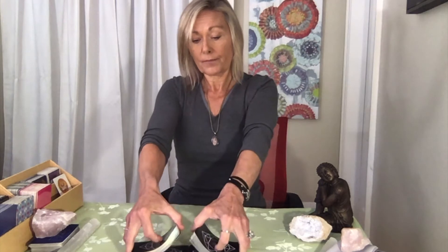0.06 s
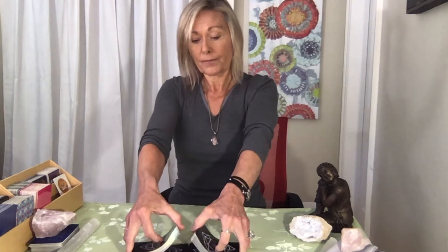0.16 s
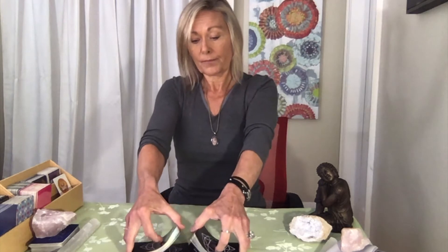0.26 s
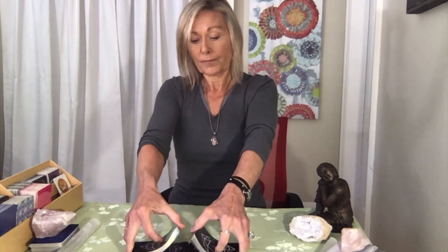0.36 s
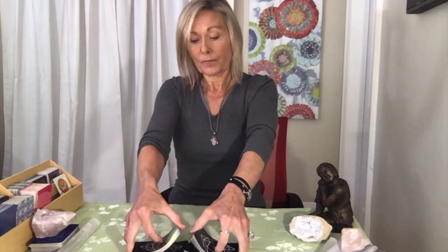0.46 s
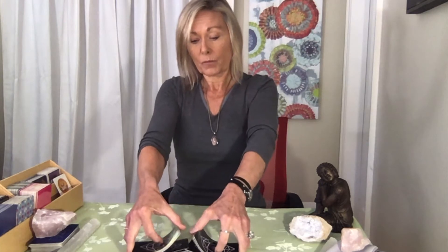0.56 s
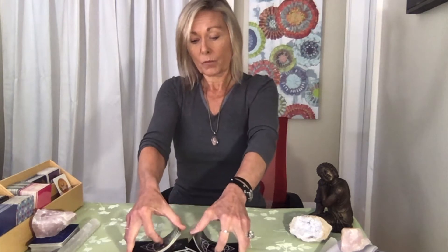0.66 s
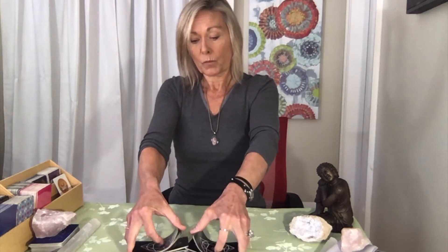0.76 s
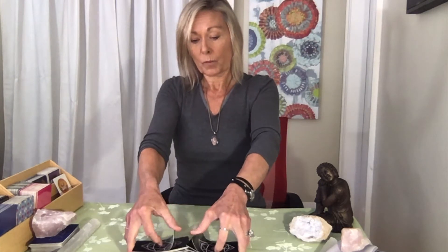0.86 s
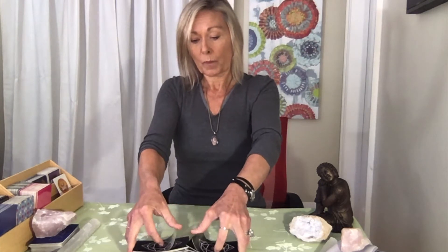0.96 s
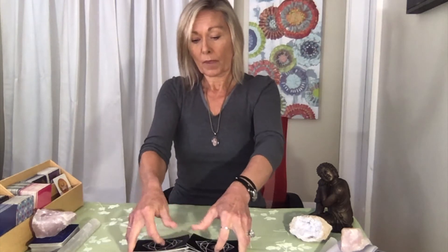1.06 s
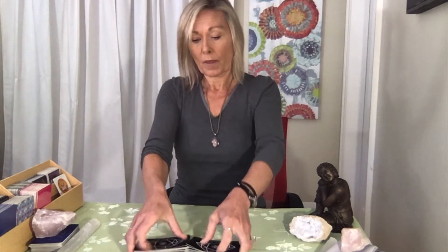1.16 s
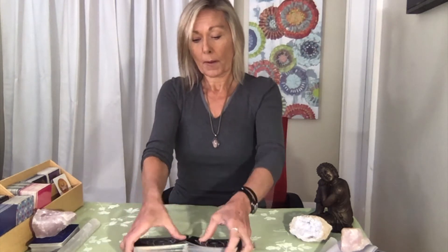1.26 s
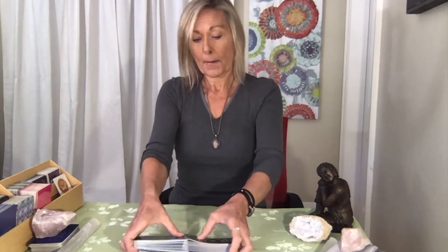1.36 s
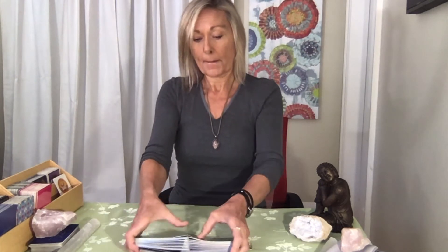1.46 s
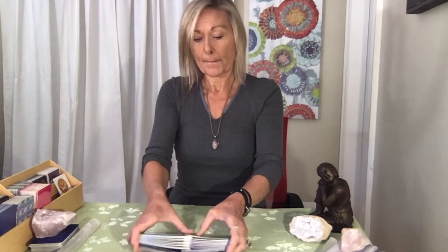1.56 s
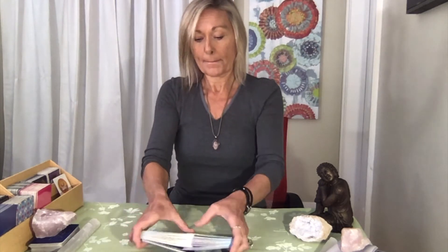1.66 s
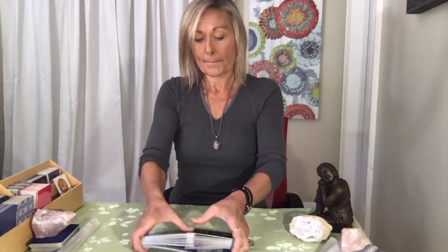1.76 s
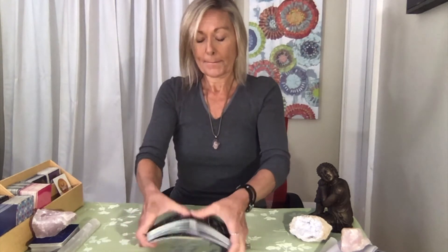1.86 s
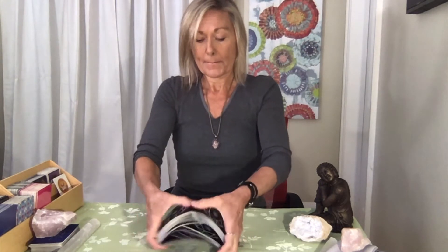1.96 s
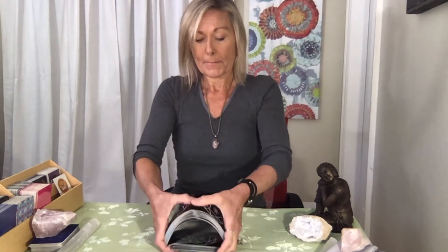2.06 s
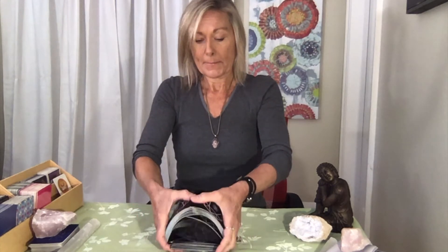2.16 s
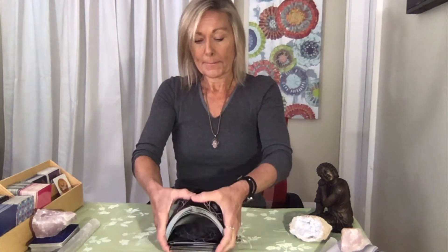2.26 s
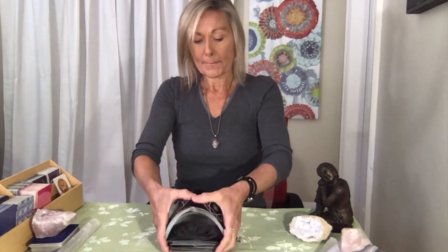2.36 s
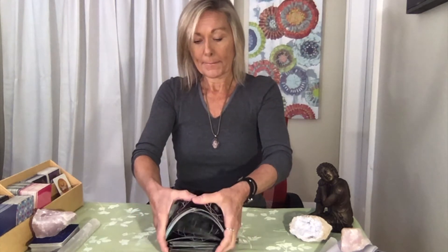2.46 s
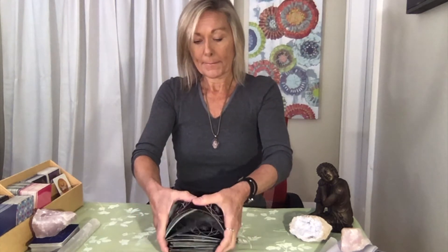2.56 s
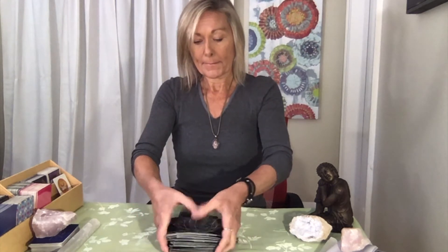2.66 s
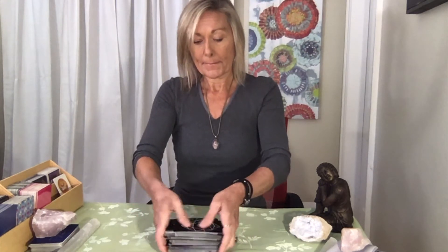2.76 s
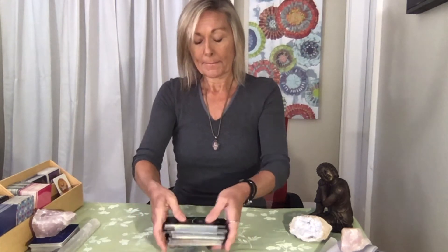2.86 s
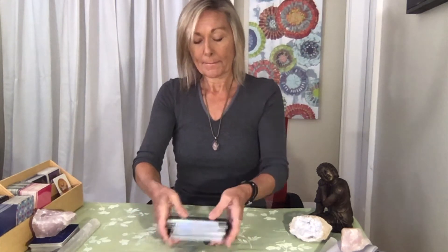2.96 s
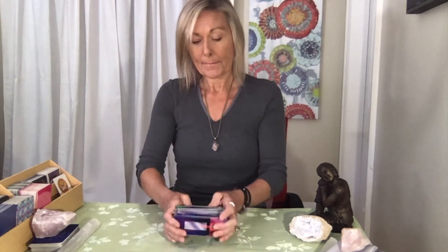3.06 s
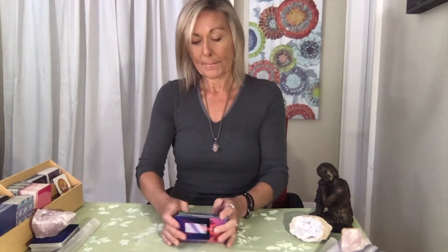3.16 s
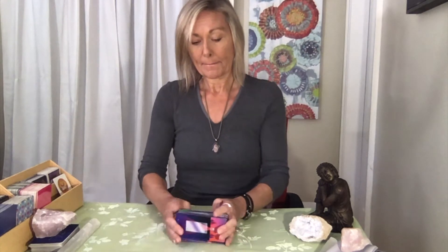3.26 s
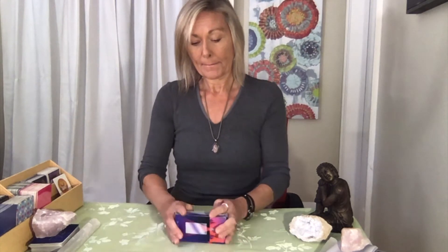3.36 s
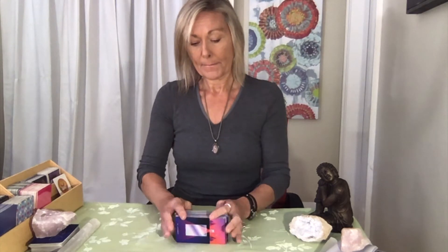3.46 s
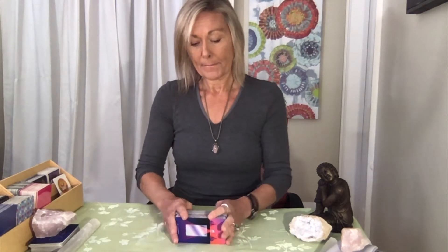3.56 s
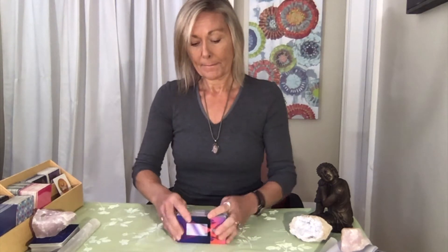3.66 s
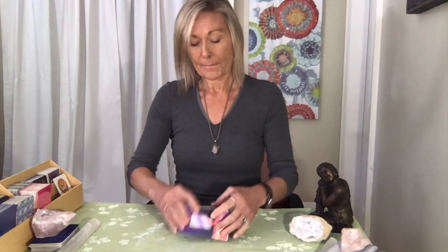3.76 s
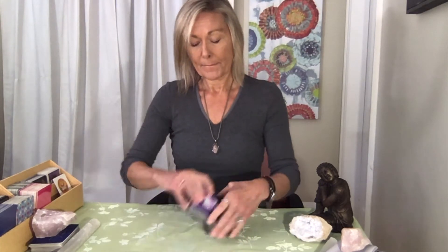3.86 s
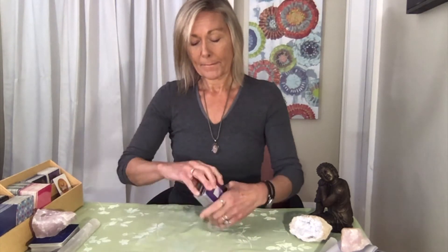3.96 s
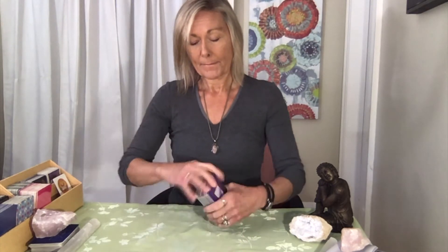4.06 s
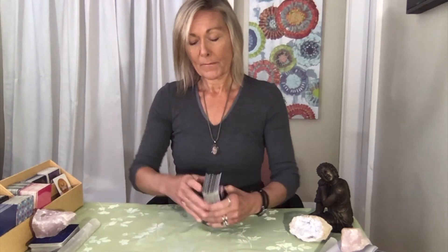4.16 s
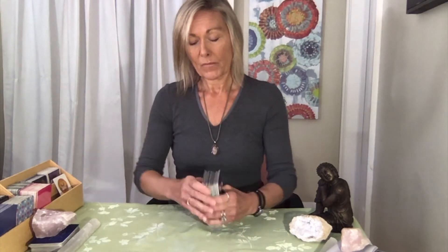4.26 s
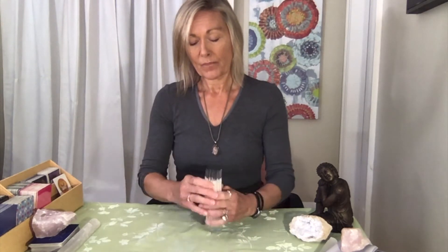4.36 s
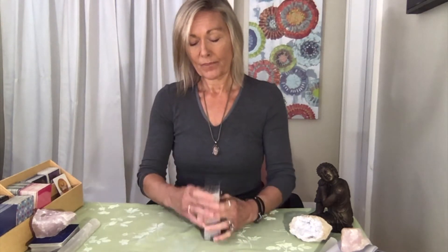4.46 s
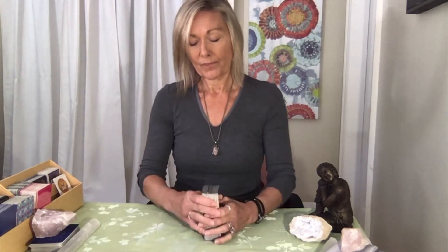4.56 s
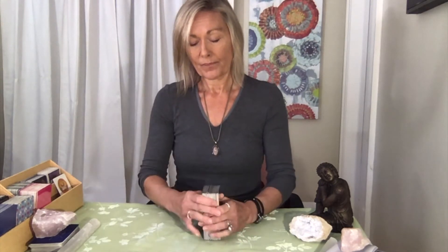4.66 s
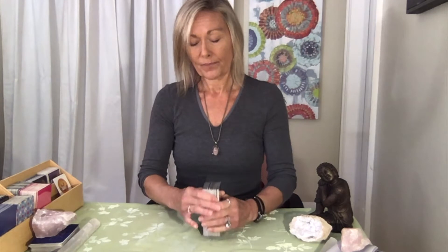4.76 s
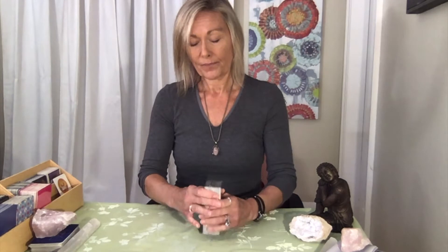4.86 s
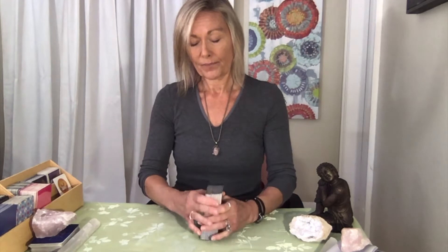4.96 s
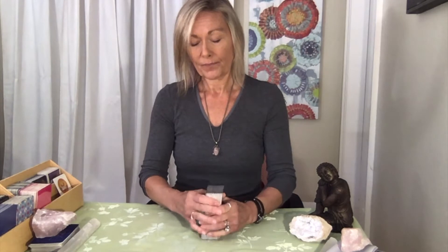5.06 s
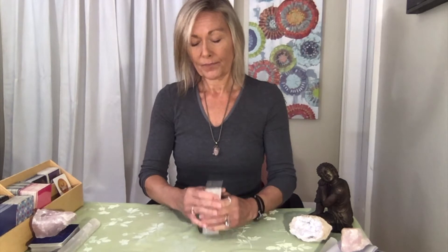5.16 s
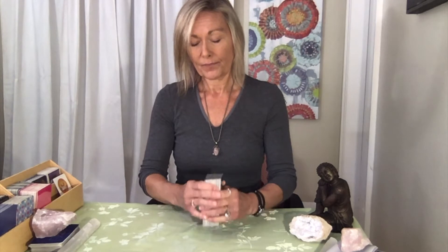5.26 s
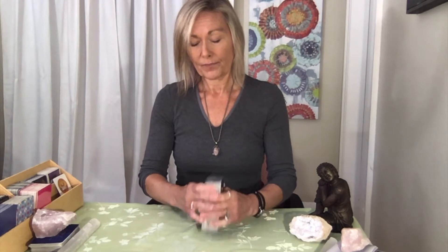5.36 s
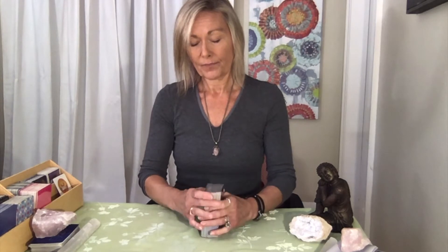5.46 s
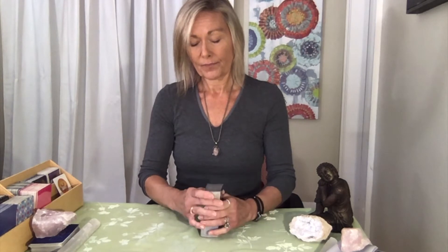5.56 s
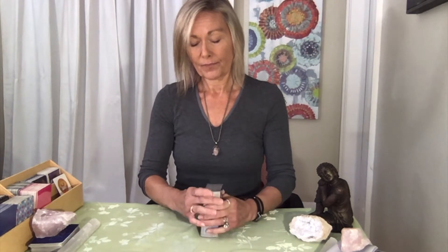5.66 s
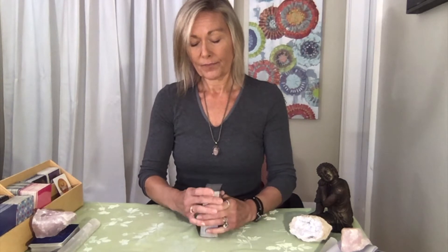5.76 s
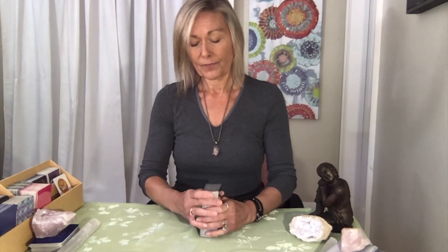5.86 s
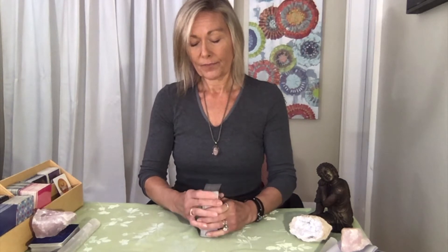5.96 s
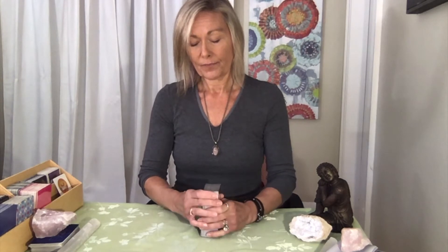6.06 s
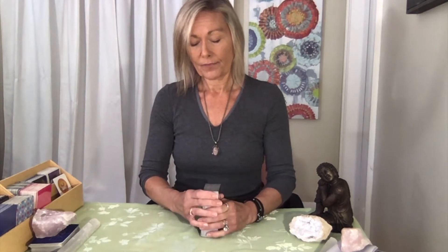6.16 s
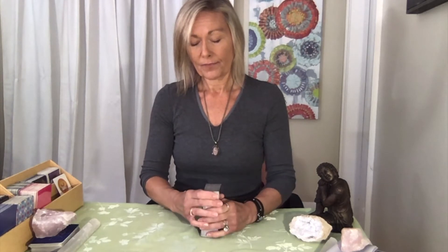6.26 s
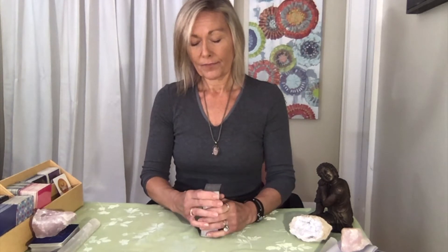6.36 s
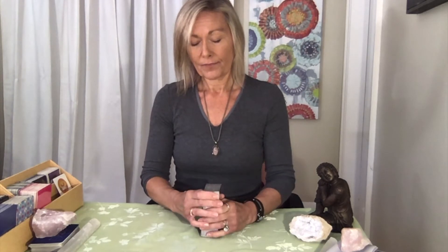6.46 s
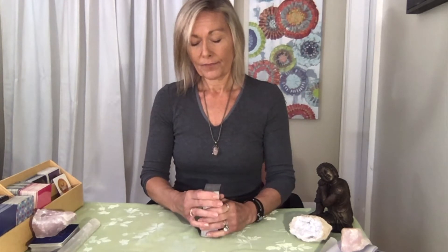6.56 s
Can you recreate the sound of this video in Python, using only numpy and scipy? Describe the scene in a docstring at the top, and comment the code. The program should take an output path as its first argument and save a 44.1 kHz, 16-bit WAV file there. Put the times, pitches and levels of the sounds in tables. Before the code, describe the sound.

A deck of large stiff cards is riffled close by: uneven snaps, airy pops and bright cracks over papery rasping for about a second. After a quieter gap the cards slide together with softer slaps and rasps. Then the deck is knocked on a cloth-covered wooden table, two thuds strong and two faint. Steady low hum and hiss; small, slightly echoing room.

```python
"""In a quiet curtained room, over steady hum and hiss, large cards are riffled on a cloth-covered wooden table:
packets slap down as snaps, pops of air and cracks of noise, while faces rasp as streams of random grains.
Fingers brush the deck, then the bridge slides together with softer slaps and rasps, and they brush it again.
Last, the deck is knocked square: filtered ticks and ringing table modes, each knock with a softer bounce.
A wall echo and a diffuse tail answer the cards and the upper part of the table sound."""
import sys
import numpy as np
from scipy import signal
from scipy.fft import rfft, irfft
from scipy.io import wavfile

SR = 44100
rng = np.random.default_rng(int(sys.argv[2]) if len(sys.argv) > 2 else 0)


def inscribe(sig):
    """Save sig as 16-bit PCM at rate SR to the path in sys.argv[1].

    A 1-D sig is mono; a 2-D sig holds one channel per row.
    Samples are clipped to [-1, 1] before scaling.
    """
    pcm = np.round(np.clip(np.atleast_2d(sig).T, -1, 1) * 32767)
    wavfile.write(sys.argv[1], SR, pcm.astype(np.int16))


N = 291456

# Room hum and hiss, relative noise spectrum: frequency_hz [Hz], density_db [dB per Hz]
HUM_SPECTRUM = [(15, -67), (25, -19.5), (37, 4.5), (69, -10.5), (129, 0.5), (169, -11.5), (221, -9.5),
                (289, -20), (349, -14), (469, -22), (666, -20), (2120, -33.5), (3000, -41.5), (7500, -50.5),
                (15500, -69.5)]
# Diffuse room tail: frequency_hz [Hz], t60_s [s], level_db [dB, relative]
ROOM_TAIL = [(100, 0.87, -1), (507, 0.34, 0), (1410, 0.29, 2), (2000, 0.42, -4), (3500, 0.28, 2.5),
             (5900, 0.3, -2), (13700, 0.18, -0.5)]
# Microphone and its housing: frequency_hz [Hz], gain_db [dB]
MIC_RESPONSE = [(900, 0.5), (1250, 2.5), (1600, -2), (2080, 3), (2600, 0), (4100, 0.5), (5200, -1)]
# Table top modes: pitch_hz [Hz], level_db [dB, relative], t60_s [s], side [sign of the first swing]
TABLE_MODES = [(62.2, -6, 0.54, -1), (92.9, -2.5, 0.34, -1), (130.7, 6, 0.092, 1), (166, -5.5, 0.28, 1),
               (185.8, -4.5, 0.27, -1), (212.7, -12, 0.23, 1), (248.7, -4.5, 0.14, -1),
               (295.2, -6.5, 0.15, 1), (382, -2.5, 0.19, -1), (404, -4, 0.19, 1), (434, -8, 0.11, -1),
               (506.7, -7, 0.096, -1), (554.6, -29.5, 0.16, 1), (655, -14, 0.098, 1),
               (686.6, -15, 0.05, -1), (809, -19.5, 0.12, -1), (901, -23, 0.077, 1)]
# Deck edge knocked on the table: start_s [s], level_db [dB, relative], hardness_db [dB per octave],
# deep_db, middle_db, woody_db [dB on the lowest modes, middle modes and woody pair],
# middle_hz [Hz, centre of the middle modes, set by where the deck lands]
KNOCKS_TABLE = [(3.193, -35.5, -5.5, -1.5, 2.2, 12.7, 130), (4.4954, -16, 0.5, -6, 2, 3.4, 169),
                (4.946, -32, 0, 1, 6.3, 9.5, 135), (5.4348, -17.5, 0.5, 3, 11.9, 2, 222)]
# Fingers shifting on the deck: start_s [s], level_db [dB]
FINGER_BRUSHES = [(1.14, -77), (1.255, -80.5), (1.56, -80), (3.09, -78)]
# Card faces sliding: start_s [s], rise_s [s], length_s [s], rasp_db [dB],
# tone_db [dB, hollow tone against the rasp]
CARD_STROKES = [(.0, 0.0023, 0.045, -82, 14), (0.058, 0.028, 0.11, -59, -3.5), (0.178, 0.042, 0.69, -66, 3),
                (0.779, 0.027, 0.071, -53.5, 2), (0.987, 0.0059, 0.013, -45, -25),
                (1.948, 0.085, 0.14, -63.5, -4), (2.08, 0.0089, 0.24, -59.5, -12.5),
                (2.256, 0.023, 0.13, -56, -10.5), (2.344, 0.064, 0.13, -65, 11.5),
                (2.462, 0.016, 0.04, -66, 9), (2.549, 0.011, 0.099, -63, 3),
                (2.622, 0.04, 0.082, -54, -12.5)]
# Rasp of card faces, relative noise spectrum: frequency_hz [Hz], density_db [dB per Hz]
RASP_SPECTRUM = [(1470, -13), (2100, -1.5), (2700, -4), (3400, -4.5), (4430, -8), (4970, -1), (7340, 0),
                 (8880, -8), (12000, -13), (13000, -14), (15500, -18)]
# Resonances of a bent card: pitch_hz [Hz], width_hz [Hz], level_db [dB, relative]
SNAP_MODES = [(1995, 237, 0), (3020, 270, -4), (3290, 480, -6.5)]
# Resonances of air squeezed between cards: pitch_hz [Hz], width_hz [Hz], level_db [dB, relative]
POP_MODES = [(684, 810, -3.5), (1024, 250, 2.5), (1352, 300, -1)]
# Cards slapping down, and strong wall echoes about 8 ms after two of them (rows at 0.865 and 1.0199 s):
# start_s [s], level_db [dB, relative], bright_db [dB, crack against pop],
# thump_db [dB, table thump, relative], tuning_st [semitones, shift of the card and air resonances]
CARD_SLAPS = [(0.0885, -38, -2, -4, 6.5), (0.1228, -39, -4, -8, -1), (0.1714, -38.5, -1, 3, 2),
              (0.18, -23.5, -5.5, -16, 1.5), (0.2385, -38, 10, -5, 11.5), (0.2813, -27.5, 3, -2.5, 0.3),
              (0.3008, -29, -8, -18, 5), (0.3198, -36, 2, -3, 3.5), (0.3799, -26, -9, -3, -1.5),
              (0.41, -32.5, 8, -10.5, 1.3), (0.4563, -23.5, -4.5, -7.5, -1.3), (0.504, -24.5, 0, -8, 1.8),
              (0.522, -41, 32, -6, 16), (0.5657, -21.5, 10.5, -6, -0.4), (0.5741, -29, 1, -12, 3.5),
              (0.589, -28, 13, -12, 5.5), (0.649, -30, -8, -2.5, 1.5), (0.676, -18, 10, -14, 0.5),
              (0.702, -34, 37, -6, -3.5), (0.7277, -30.5, 1, -7, -1.5), (0.776, -27, -4, -10.5, -2.5),
              (0.8043, -25.5, 4, -5, -1), (0.8259, -24.5, -4.5, -14.5, 3.5), (0.8567, -19.5, 5, -21, -1.5),
              (0.865, -23, 6, -13.5, 7.5), (0.997, -31, 20, -4, -2.5), (1.007, -42.5, 33, -39, 11),
              (1.0115, -24, 1, -17.5, 3.5), (1.0199, -32.5, 10, -10.5, 7.5), (2.0418, -35.5, -11, -8, -3.5),
              (2.141, -33.5, 18, -26, -1.5), (2.2235, -40.5, 7, -33, -3), (2.2921, -40.5, -2, -28, -6.5),
              (2.398, -42, 1, -24, 2), (2.4148, -35.5, 4, -16, 0.2), (2.446, -41, 0, -17, 6),
              (2.4683, -35, -22.5, -31, 2), (2.4766, -39, -21, -33, -0.5), (2.55, -31.5, 14.5, -35, 4),
              (2.665, -37.5, -9, -13, -1), (2.7, -29.5, -12, -20, -1), (2.7541, -41, 3, -23, 7),
              (3.551, -49, -20, -25, 2)]

HUM_DB = -51.5  # rms before the microphone
ECHO_S, ECHO_DB, WALL_LOW_HZ, WALL_HIGH_HZ = 0.0074, -6, 2160, 8500  # wall echo; level before its band filter
TAIL_DB = -6.5  # total energy of the diffuse tail
MIC_LOW_HZ, TOP_STOP_HZ = 52.5, 15910
DEEP_HZ, WOODY_HZ = 72.6, 393  # centres of the lowest modes and of the woody pair
LANDING_S = 0.002  # blows land unevenly: modes well above the woody pair start up to this late
# the deck bounces once: delay, loss, change of hardness [dB per octave] and of the woody pair
BOUNCE_S, BOUNCE_DB, BOUNCE_HARDNESS_DB, BOUNCE_WOODY_DB = 0.066, -11.5, 1.5, -33
BOUNCE_FOLLOWS = 0.64  # a softer knock bounces still less: extra dB lost per dB under the loudest
BRUSH_RISE_S, BRUSH_S = 0.0067, 0.04
STROKE_FALL_S = 0.0077  # time to fall by 1/e
FLICKS_PER_S, FLICK_DB, RUB_DB = 380, -17, -3  # single flicks; against the rasp; smooth rub against flicks
POP_TONE_DB = -3  # air between the cards against the bent card's tone
# a short rasp after every slap, dying away: drive, time to fall by 1/e
SLAP_RASP_DB, SLAP_RASP_FALL_S = -26.5, 0.014
FADE_IN_S = 0.0065  # time constant of the faint noise fading in just ahead of each slap
SNAP_DRIVE_DB, POP_DRIVE_DB, CRACK_DB, THUMP_DB = 26, 22.5, -23, -5  # drive of each part of a slap
SNAP_MS, POP_MS, RAGGED = 1.4, 1.6, 0.4  # 1/e time of the noisy trail behind each click, share of noise
CRACK_MS, CRACK_RAGGED = 2.5, 1.6
SNAP_SOFT_HZ = 4260  # the card's flat face softens the snap above this
DETUNE_ST = 0.5  # standard deviation of each resonance's own stray, in semitones
TINY = 1e-18  # inaudible offset that keeps the filters out of denormal numbers


def from_db(db):
    """Gain of a level."""
    return 10 ** (np.asarray(db) / 20)


def rms_one(x):
    """Scale to rms 1."""
    return x / np.sqrt(np.mean(x ** 2) + 1e-20)


def at_hz(points, hz):
    """Read a table on a log-frequency axis."""
    points = np.array(points)
    return np.interp(np.log(np.maximum(hz, 1)), np.log(points[:, 0]), points[:, 1])


def butter(x, order, hz, kind="low"):
    """Butterworth filter with a smooth passband."""
    return signal.sosfilt(signal.butter(order, hz, kind, fs=SR, output="sos"), x)


def colour(x, spectrum):
    """Filter to a spectrum; white noise of rms 1 stays near rms 1."""
    gain = from_db(at_hz(spectrum, np.fft.rfftfreq(N, 1 / SR)))
    return irfft(rfft(x) * rms_one(gain), N)


def hollow(x, modes):
    """Broad resonances in parallel, signs alternating."""
    out = 0
    for k, (hz, width, db) in enumerate(modes):
        r = np.exp(-np.pi * width / SR)
        b = (1 - r * r) / 2 * np.array([1, 0, -1])
        a = [1, -2 * r * np.cos(2 * np.pi * hz / SR), r ** 2]
        out = out + (-1) ** k * from_db(db) * signal.lfilter(b, a, x + TINY)
    return out


def grains(per_s, spread_db):
    """Random slips of uneven size, rms 1."""
    excess = np.minimum(rng.exponential(1, N), 4)
    slips = rng.random(N) < per_s / SR
    return rms_one(from_db(spread_db * excess) * rng.standard_normal(N) * slips)


def bursts(times, dbs, decay_ms, ragged):
    """A click at every time, trailed by dying noise."""
    clicks = np.zeros(N)
    clicks[np.round(times * SR).astype(int)] = from_db(dbs)
    fall = np.exp(-1000 / (decay_ms * SR))
    trail = signal.lfilter([1], [1, -fall], clicks + TINY) * rng.standard_normal(N)
    return clicks + ragged * trail


def room_hum():
    """Steady hum and hiss of the room: noise shaped to its spectrum."""
    return from_db(HUM_DB) * rms_one(colour(rng.standard_normal(N), HUM_SPECTRUM))


def room(x):
    """One strong, thin wall echo, then a diffuse tail that dies band by band."""
    t = np.arange(SR // 2) / SR
    edges = 60 * 2.0 ** np.arange(0, 8.5, 0.5)  # half-octave bands
    levels = np.array(ROOM_TAIL)[:, ::2]
    tail = 0
    for low, high in zip(edges, edges[1:]):
        band = butter(rng.standard_normal(len(t)), 2, [low, high], "band")
        hz = np.sqrt(low * high)
        tail = tail + band * from_db(at_hz(levels, hz) - 60 * t / at_hz(ROOM_TAIL, hz))
    tail = tail * np.clip((t - 0.003) / 0.013, 0, 1)  # reflections thicken with time
    wall = from_db(ECHO_DB) * (np.arange(len(t)) == round(ECHO_S * SR)) + TINY
    response = from_db(TAIL_DB) * tail / np.sqrt(np.sum(tail ** 2))
    response += butter(wall, 2, [WALL_LOW_HZ, WALL_HIGH_HZ], "band")
    return x + signal.fftconvolve(x, response)[:N]


def table(times, dbs, hardness_db, deep_db, middle_db, woody_db, middle_hz, contact_hz, scatter_db):
    """Blows ring the table's decaying modes; a harder blow favours the upper ones, soft contact dulls all."""
    out = np.zeros(N)
    chance = rng.normal(0, 1, (len(times), len(TABLE_MODES)))
    late = rng.random(chance.shape) * LANDING_S
    for k, (hz, db, t60, side) in enumerate(TABLE_MODES):
        # where the blow lands decides which groups of modes it feeds
        place_db = middle_db * np.exp(-(np.log2(hz / middle_hz) / 0.35) ** 2)
        place_db = place_db + woody_db * np.exp(-(np.log2(hz / WOODY_HZ) / 0.12) ** 2)
        place_db = place_db + deep_db * np.exp(-(np.log2(hz / DEEP_HZ) / 0.5) ** 2)
        blow_db = dbs + hardness_db * np.log2(hz / 200) + scatter_db * chance[:, k]
        at = np.round((times + late[:, k] * (hz > WOODY_HZ * 1.2)) * SR).astype(int)
        clicks = np.zeros(N) + TINY
        clicks[at] = np.sign(side) * from_db(db + place_db + blow_db)
        r = from_db(-60 / (t60 * SR))
        w = 2 * np.pi * hz / SR
        out += signal.lfilter([0, np.sin(w)], [1, -2 * r * np.cos(w), r * r], clicks)
    return butter(out, 3, contact_hz)


def swells(starts, rises, lengths, dbs):
    """Level of sliding strokes: each rises, holds and dies away."""
    t, out = np.arange(N) / SR, 0
    for start, rise, length, db in np.broadcast(starts, rises, lengths, dbs):
        up = np.clip((t - start) / rise, 0, 1) ** 2
        down = np.exp(-np.maximum(t - start - length, 0) / STROKE_FALL_S)
        out = out + from_db(db) * up * down
    return out


def finger_brushes():
    """Fingers shifting on the deck: short swells of noise in the colour of the card faces."""
    s, db = np.transpose(FINGER_BRUSHES)
    return swells(s, BRUSH_RISE_S, BRUSH_S, db) * colour(rng.standard_normal(N), RASP_SPECTRUM)


def slap_rasps():
    """Level of a short rasp after every slap, dying away, with faint noise fading in just ahead."""
    s, db, bright_db, *_ = np.transpose(CARD_SLAPS)
    starts = np.zeros(N) + TINY
    starts[np.round(s * SR).astype(int)] = from_db(db + bright_db / 2 + SLAP_RASP_DB)
    after = signal.lfilter([1], [1, -np.exp(-1 / (SLAP_RASP_FALL_S * SR))], starts)
    # the fade-in is a decay filtered backwards in time
    ahead = signal.lfilter([0, 1], [1, -np.exp(-1 / (FADE_IN_S * SR))], starts[::-1])[::-1]
    return after + ahead


def slides():
    """Single cards flick free over the fine rasp of their faces, in uneven surges that ring hollow."""
    slow_noise = butter(rng.standard_normal(N), 2, 60)
    surge = from_db(2.2 * rms_one(slow_noise))
    flicks = grains(per_s=FLICKS_PER_S, spread_db=2.0)
    rasp = colour(grains(per_s=9900, spread_db=6.0) + from_db(FLICK_DB) * flicks, RASP_SPECTRUM)
    rub = from_db(RUB_DB) * rng.standard_normal(N) + flicks
    tone = rms_one(hollow(rub, SNAP_MODES)) + from_db(POP_TONE_DB) * rms_one(hollow(rub, POP_MODES))
    *shape, rasp_db, tone_db = np.transpose(CARD_STROKES)
    rasping = (swells(*shape, rasp_db) + slap_rasps()) * rasp
    ringing = swells(*shape, rasp_db + tone_db) * tone
    return surge * (rasping + ringing)


def knocks():
    """The cloth softens the deck's edge: the table sounds, the cards only tick faintly and dully."""
    bounces = np.add(KNOCKS_TABLE, [BOUNCE_S, BOUNCE_DB, BOUNCE_HARDNESS_DB, 0, 0, BOUNCE_WOODY_DB, 0])
    bounces[:, 1] += BOUNCE_FOLLOWS * (bounces[:, 1] - bounces[:, 1].max())
    s, db, *landing = np.transpose(np.vstack([KNOCKS_TABLE, bounces]))
    tick = butter(bursts(s, db - 20, decay_ms=13, ragged=0.83), 4, 2200)
    ticks = from_db(-16.0) * hollow(tick, SNAP_MODES) + hollow(tick, POP_MODES)
    wood = table(s, db - 9.0, *landing, contact_hz=1140, scatter_db=1.0)
    return ticks, wood


def struck(times, dbs, tunings, modes, decay_ms, ragged, scatter_db):
    """Bursts into broad resonances; every card bends its own way, so they shift and sound unevenly."""
    t, out = np.arange(SR // 20) / SR, np.zeros(N + SR)
    chance = rng.normal(0, 1, (len(times), 2, len(modes)))
    for s, db, tuning, (loud, stray) in zip(times, dbs, tunings, chance):
        own = []
        for (hz, width, level), a, b in zip(modes, loud, stray):
            own.append((hz * 2 ** ((tuning + DETUNE_ST * b) / 12), width, level + scatter_db * a))
        burst = (t == 0) + ragged * rng.standard_normal(len(t)) * np.exp(-t * 1000 / decay_ms)
        burst = burst / np.sqrt(np.sum(burst ** 2))  # equal energy
        at = round(s * SR)
        out[at:at + len(t)] += from_db(db) * hollow(burst, own)
    return out[:N]


def slaps():
    """Slaps and two strong wall echoes: bent-card snap, pop of air, noisy crack, thump that rings the table."""
    s, db, bright_db, thump_db, tuning = np.transpose(CARD_SLAPS)
    snap = struck(s, db + SNAP_DRIVE_DB, tuning, SNAP_MODES,
                  decay_ms=SNAP_MS, ragged=RAGGED, scatter_db=2.0)
    snap = butter(snap, 2, SNAP_SOFT_HZ)
    # a brighter slap trades pop for crack
    pop = struck(s, db + POP_DRIVE_DB - bright_db / 2, tuning, POP_MODES,
                 decay_ms=POP_MS, ragged=RAGGED, scatter_db=2.0)
    spray = bursts(s, db + CRACK_DB + bright_db / 2, decay_ms=CRACK_MS, ragged=CRACK_RAGGED)
    crack = colour(spray, RASP_SPECTRUM)
    thump = table(s, db + thump_db + THUMP_DB, hardness_db=2.5, deep_db=-2.3, middle_db=-6.5,
                  woody_db=-13, middle_hz=201, contact_hz=674, scatter_db=4.5)
    return snap + pop + crack, thump


def scene():
    """Cards and table in the room, over its hum."""
    cards, thumps = slaps()
    ticks, blows = knocks()
    wood = thumps + blows
    # the bass travels through the table, the rest also through the air
    airborne_wood = from_db(1) * butter(wood, 4, 560, "high")
    in_room = room(cards + ticks + slides() + finger_brushes() + airborne_wood)
    return (in_room + wood + room_hum())[None]


def record(dry):
    """The microphone colours the middle and loses the deepest bass; the top is cut."""
    gain = from_db(at_hz(MIC_RESPONSE, np.fft.rfftfreq(N, 1 / SR)))
    coloured = irfft(rfft(dry) * gain, N)
    bass_cut = butter(coloured, 4, MIC_LOW_HZ, "high")
    return signal.sosfilt(signal.cheby2(16, 60, TOP_STOP_HZ, fs=SR, output="sos"), bass_cut)


dry = scene()
out = record(dry)
inscribe(out)
```